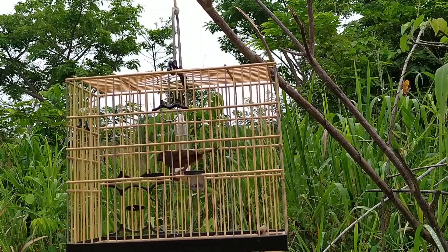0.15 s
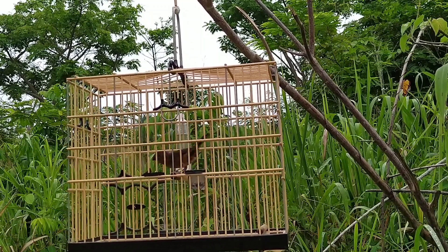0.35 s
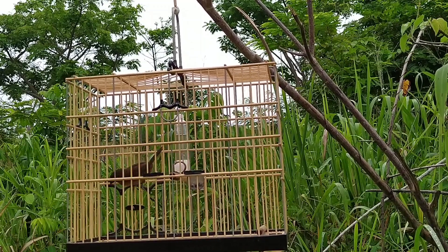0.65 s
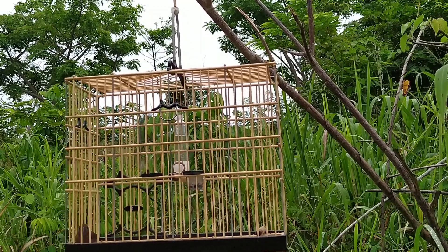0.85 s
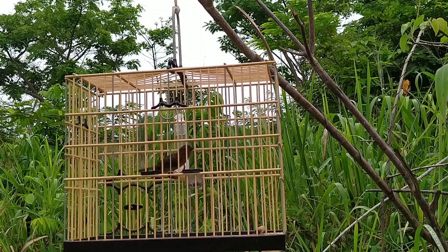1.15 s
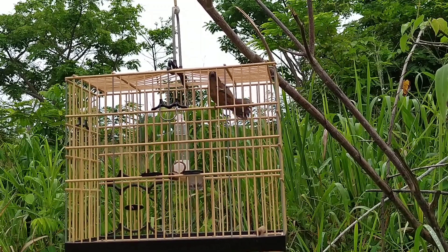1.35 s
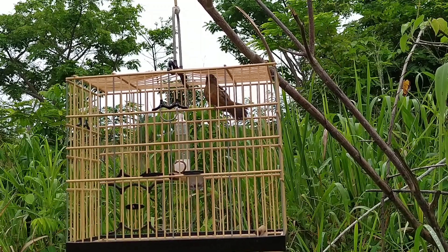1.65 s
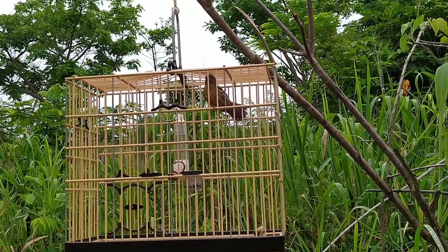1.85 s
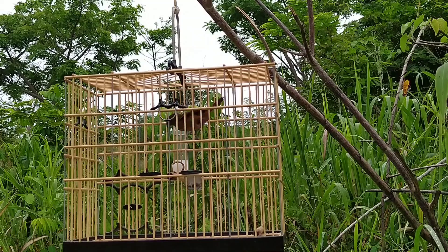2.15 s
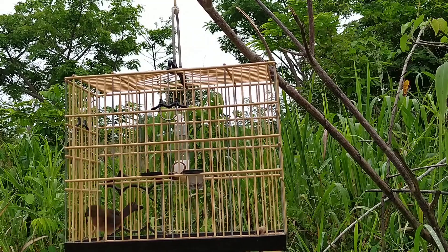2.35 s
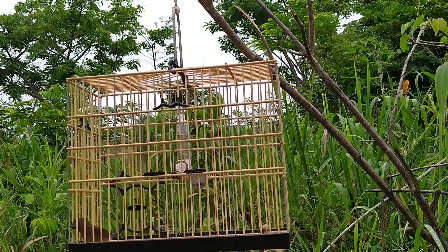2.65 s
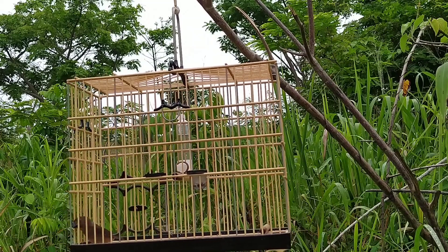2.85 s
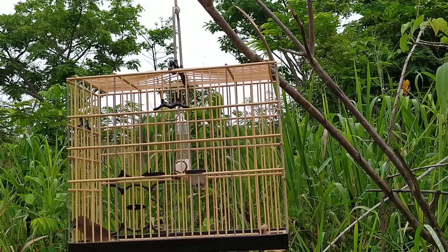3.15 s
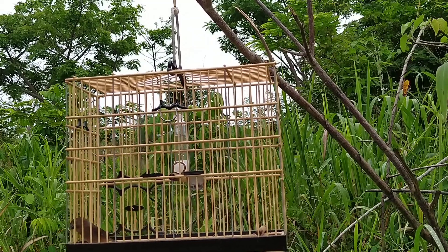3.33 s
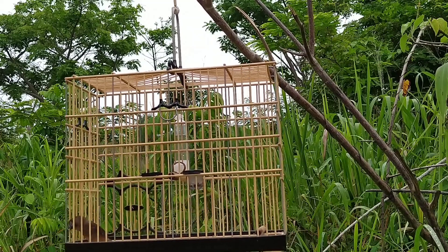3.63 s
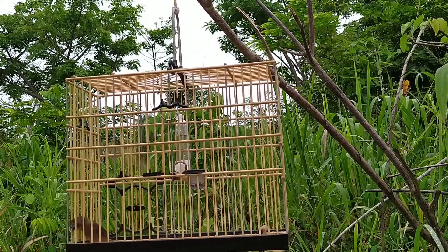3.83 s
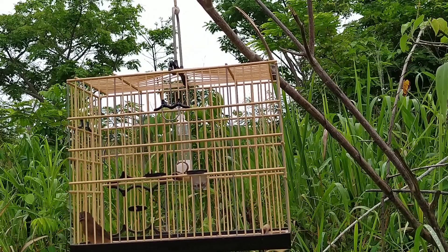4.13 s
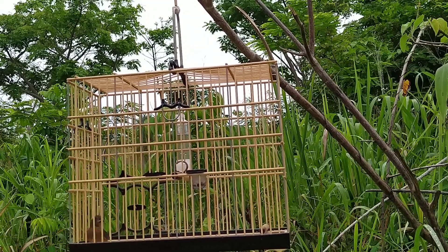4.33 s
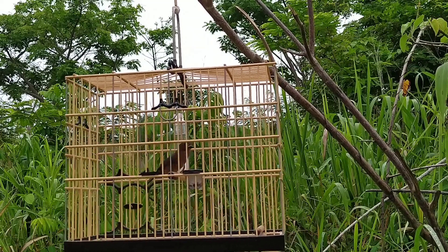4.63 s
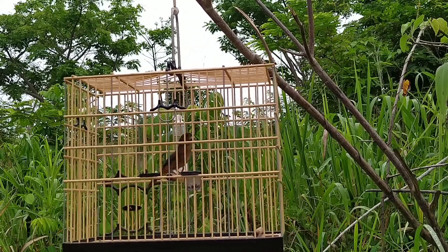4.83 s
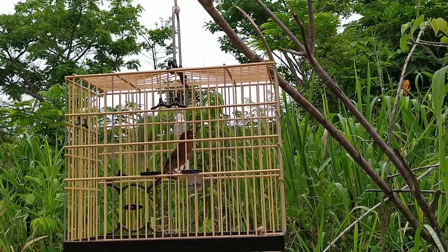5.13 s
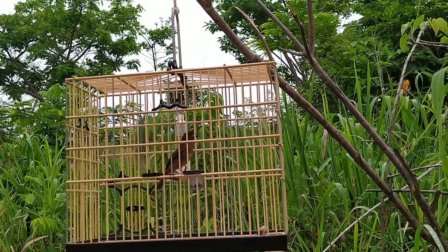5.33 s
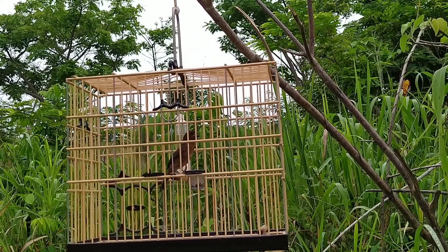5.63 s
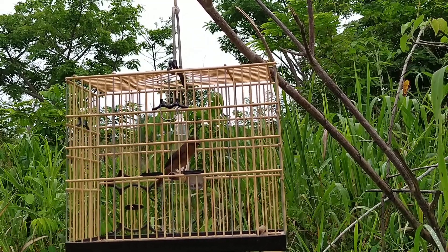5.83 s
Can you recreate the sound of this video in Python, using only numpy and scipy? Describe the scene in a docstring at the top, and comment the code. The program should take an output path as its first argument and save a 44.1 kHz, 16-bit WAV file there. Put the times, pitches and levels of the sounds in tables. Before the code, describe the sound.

A soft open-air hush and the thin, high pulsing of crickets run throughout. A bird hops in a cane cage, making light scratches and small knocks, clearest around 0.75 and 1 second and again at 2.4 seconds. Far off, another bird gives one faint arching whistle from 0.3 to 0.9 seconds, and a few tiny chips and low blips follow near 2 seconds. A distant engine revs very faintly in short rising bursts now and then.

At about 2.3 seconds a small bird, close to the microphone and slightly to the right, begins singing rapid, gliding whistled notes. The song starts softly and swells, becoming by far the loudest sound. Many notes slide downward, with a longer rising one around 4.5 seconds. It is loudest and busiest from about 4 seconds until the end at 6 seconds, with only a slight echo from the foliage.

```python
"""Finch in the bush, close up.

A finch near the camera's microphones sings a swelling phrase of gliding whistles: membranes in its
syrinx vibrate, throat and beak colour the tone, and stems and leaves scatter it back. Two crickets
scrape their wings, a bird hops about a cane cage and another whistles far off, with a few faint blips.
A distant engine revs under the hush of the open air."""
import sys
import numpy as np
from scipy import signal
from scipy.fft import rfft, irfft
from scipy.io import wavfile
from scipy.ndimage import uniform_filter1d, map_coordinates

SR = 44100
rng = np.random.default_rng(int(sys.argv[2]) if len(sys.argv) > 2 else 0)


def master(y):
    """Save y as 16-bit WAV."""
    cut = np.clip(np.atleast_2d(y).T, -1, 1)
    pcm = np.round(cut * 32767)  # scale
    wavfile.write(sys.argv[1], SR, pcm.astype(np.int16))


N = 263718

# The hush of the place. Each row: frequency in Hz, relative noise density in dB.
AIR_COLOUR = [(12, -48), (20, 7.5), (98, -9), (141, -11.5), (416, -12), (1020, -21), (2340, -23.5),
              (5110, -26.5), (6560, -26.5), (7130, -12), (7760, -28), (9420, -20.5), (12100, -33.5),
              (14300, -35.5), (15600, -38)]
# Slow rise and fall of the background's treble hiss. Each row: time in seconds, treble lift in dB.
TREBLE_DRIFT = [(0, 10.5), (.1, -5.5), (.7, -2), (1.3, -0.5), (1.6, -3), (2.1, -2.5), (3, .5), (6, 2)]
# How alike the air is at the two microphones. Each row: frequency in Hz, correlation.
AIR_LIKENESS = [(60, 0.37), (130, 0.33), (290, 0.4), (640, 0.42), (1410, -0.21), (3100, -0.042),
                (6820, -0.22), (15000, 0.24)]
# Claws and wings against the cage. Each row: start in seconds, relative scratch and knock levels
# in dB, left over right in dB, seconds for the scratch to fall 60 dB.
CAGE_CONTACTS = [(0.069, -61, -70, -1.5, 0.072), (0.3341, -64.5, -76, 0, 0.11),
                 (0.584, -62, -77, -1, 0.086), (0.726, -42.5, -70, -4, 0.013),
                 (0.729, -52.5, -69, -0.5, 0.05), (0.7431, -49, -57, -1, 0.079),
                 (0.756, -54, -48.5, -1, 0.043), (0.7667, -56, -49.5, 0, 0.057),
                 (0.7822, -66.5, -55, -3, 0.25), (1.0202, -50.5, -65, 8, 0.012),
                 (1.023, -62, -71, -1, 0.11), (1.051, -50, -56, -1, 0.11), (1.07, -49.5, -53.5, -1, 0.064),
                 (2.166, -58.5, -83, -2, 0.048), (2.3905, -52, -51, 0, 0.12), (2.4101, -64, -47.5, -3, 0.1)]
# The ring of the cane bars. Each row: frequency in Hz, relative level in dB, seconds to fall 60 dB.
CANE_MODES = [(236, -22, 0.046), (325, -24, .05), (397, -6, 0.18), (476, -9, 0.068), (547, 3, 0.063),
              (600, -24, 0.016), (830, -6.5, 0.075), (1120, -8, 0.034), (1326, -1, 0.041), (1540, -13, .03),
              (1955, 2.5, 0.025), (2560, -2, 0.033), (2890, -8, 0.031)]
# A scratch on cane. Each row: frequency in Hz, relative noise density in dB.
SCRATCH_COLOUR = [(590, -30), (1000, -17), (1640, -15), (1970, -11.5), (5100, -14.5), (7270, -7),
                  (9470, -2), (12000, -10.5), (15500, -23)]
# Bursts of throttle. Each row: start and end in seconds, first and last pitch in Hz, level in dB.
THROTTLE_BURSTS = [(0.254, 0.554, 72.5, 86.1, -64.5), (0.879, 1.395, 76.06, 102.2, -66),
                   (1.9, 2.204, 81.4, 101.5, -68.5), (2.502, 3.118, 77.94, 99.2, -67),
                   (3.646, 4.042, 74.4, 91.3, -67.5), (5.401, 6.006, 72.5, 91.6, -69.5)]
# Harmonics of the firing note. Each row: multiple, relative level in dB.
FIRING_HARMONICS = [(1, -2.5), (2, -10.5), (3, -5.5), (4, -11), (5, -17.5), (6, -13.5)]
# The far bird's arching call. Each row: time in seconds, pitch in Hz.
FAR_PITCH = [(0.301, 850), (0.352, 957), (0.45, 1230), (0.558, 1450), (.65, 1527), (0.719, 1543),
             (.801, 1520), (0.831, 1350), (.855, 1120)]
# Its overtones, heard from a distance. Each row: frequency in Hz, level in dB.
FAR_COLOUR = [(1700, -101), (2460, -85), (2830, -77), (3100, -66.5), (3400, -71.5), (4000, -72),
              (4300, -80), (4600, -80)]
# High chips and low blips. Each row: start and end in seconds, first and last pitch in Hz, level in dB.
BLIP_GLIDES = [(1.692, 1.731, 4100, 3610, -69.5), (1.73, 1.777, 3220, 2820, -78),
               (1.954, 1.98, 2850, 2650, -69.5), (1.978, 2.007, 2450, 2330, -73),
               (2.11, 2.283, 1560, 1510, -85), (1.897, 1.953, 249, 259, -65),
               (1.962, 1.998, 335, 326, -65.5), (1.995, 2.04, 442, 435, -67)]
# The finch's song. Each row is one note's pitch curve; each point: time in seconds, pitch in Hz.
SONG_PITCH = [
    [(2.255, 5200), (2.27, 4620), (2.291, 4290), (2.296, 4100)],
    [(2.306, 4080), (2.339, 3240)],
    [(2.411, 4440), (2.447, 4480), (2.47, 3920), (2.5, 3480)],
    [(2.558, 3990), (2.605, 4410), (2.63, 4060), (2.662, 3300)],
    [(2.717, 3705), (2.726, 7240), (2.735, 4620)],
    [(2.739, 3255), (2.78, 3454), (2.815, 3780), (2.846, 3210), (2.858, 2925)],
    [(2.913, 3050), (2.921, 6970)],
    [(2.936, 3167), (2.97, 3130), (3.025, 3620), (3.054, 3090), (3.064, 2860)],
    [(3.121, 3380), (3.128, 4490), (3.16, 3950), (3.186, 3620), (3.2, 3380)],
    [(3.255, 4500), (3.261, 4620), (3.27, 3160)],
    [(3.264, 4970), (3.275, 3970), (3.3, 3040), (3.315, 1940)],
    [(3.311, 6370), (3.33, 4800), (3.345, 4280), (3.354, 3920), (3.39, 3590), (3.421, 3310), (3.431, 3010)],
    [(3.498, 2274), (3.501, 4360), (3.506, 5600), (3.513, 3225), (3.53, 2070), (3.554, 1635)],
    [(3.559, 1980), (3.565, 2630), (3.6, 2823), (3.633, 3080), (3.66, 3640), (3.668, 3970), (3.675, 4470),
     (3.68, 6180), (3.686, 6210), (3.692, 4700)],
    [(3.749, 4140), (3.755, 5060), (3.77, 3900), (3.786, 3705), (3.8, 3557), (3.845, 3640)],
    [(3.896, 4300), (3.902, 5190), (3.911, 4630), (3.922, 3920), (3.96, 3400), (4.0, 3026), (4.04, 2650),
     (4.055, 1975)],
    [(4.124, 2930), (4.129, 5700), (4.138, 3410), (4.148, 2910), (4.154, 4480)],
    [(4.16, 4510), (4.19, 3670), (4.223, 3254), (4.25, 3000), (4.3, 2583), (4.316, 2370), (4.321, 1820)],
    [(4.389, 1162), (4.398, 1600), (4.41, 1595), (4.45, 1993), (4.52, 2563), (4.585, 2933), (4.602, 2504),
     (4.608, 2100)],
    [(4.681, 1140), (4.69, 1630), (4.702, 1670), (4.716, 1956), (4.731, 2090), (4.739, 5260), (4.748, 1977),
     (4.772, 1545), (4.782, 987)],
    [(4.834, 3750), (4.84, 5020), (4.846, 5280), (4.852, 3950)],
    [(4.855, 5680), (4.875, 4180), (4.882, 3800), (4.913, 3040)],
    [(4.911, 3650), (4.925, 3260), (4.946, 2280)],
    [(4.986, 1504), (4.995, 2530), (5.008, 2644), (5.011, 4550), (5.015, 5600), (5.022, 2124), (5.04, 1687),
     (5.055, 1220)],
    [(5.091, 3360), (5.098, 4580), (5.101, 4410)],
    [(5.102, 6070), (5.115, 6040), (5.136, 3900)],
    [(5.108, 3005), (5.115, 2990), (5.136, 1855)],
    [(5.136, 1870), (5.148, 3670), (5.17, 3240), (5.186, 2740), (5.201, 2220)],
    [(5.2, 2305), (5.21, 3990), (5.225, 3300), (5.254, 2610), (5.26, 2500), (5.269, 2010)],
    [(5.331, 1920), (5.338, 3210), (5.38, 3480), (5.42, 4280), (5.428, 4840), (5.433, 4920)],
    [(5.428, 2040), (5.437, 3050), (5.47, 3304), (5.503, 4110), (5.517, 5380)],
    [(5.521, 5290), (5.534, 5740)],
    [(5.589, 7100), (5.594, 4670), (5.599, 2160)],
    [(5.597, 6120), (5.603, 4400), (5.62, 3050), (5.65, 2335), (5.669, 2080), (5.677, 1820)],
    [(5.674, 4400), (5.68, 4280), (5.699, 2710)],
    [(5.695, 4420), (5.705, 3270), (5.74, 2560), (5.8, 1693), (5.81, 1295), (5.814, 1040)],
    [(5.897, 1807), (5.903, 2796), (5.91, 2113), (5.925, 1750), (5.937, 1307), (5.947, 3390), (5.955, 1950),
     (5.97, 1840), (5.978, 1380)],
]
# How each note is voiced. Each row: relative level at start, turn and end in dB, place of the turn
# from 0 to 1, trims of octave, upper overtones and hiss in dB.
SONG_VOICING = [(-78, -58, -55, 0.37, 17.5, -2, -34), (-64, -49, -58, 0.8, 10, 5, -50),
                (-55, -40.5, -38, 0.83, 5, 0, -53), (-43, -37, -33.5, 0.54, 3, 6, -72),
                (-46, -29, -53, 0.56, -10, .1, -40), (-41, -39, -37.5, 0.4, 1, -1, -68),
                (-50, -46, -28.5, 0.77, -9, .1, -24), (-40, -35.5, -34, 0.3, 2.5, -1.5, -65),
                (-44, -33, -31.5, 0.3, 0.5, 1, -66), (-37, -44, -27, 0.9, 2, .1, -38),
                (-40, -31, -35.5, 0.43, 0.5, -5, -35), (-40.5, -29, -31.5, 0.49, 1, 2, -54),
                (-38, -32.5, -38, 0.64, 2, -4.5, -20), (-41, -26.5, -32.5, 0.39, 0, -3.5, -53),
                (-33.5, -28.5, -30, 0.7, 1.5, -4.5, -58), (-32, -23, -31, 0.71, 5, 4.5, -50),
                (-29.5, -35.5, -20, 0.93, -5, 9.5, -28.5), (-34.5, -21.5, -30.5, 0.56, 0, 3, -56),
                (-29, -30, -24.5, 0.3, -4.5, 2, -35.5), (-32.5, -28, -30, 0.5, 0, 1, -24.5),
                (-44, -21, -33, 0.6, 9, -12, -58), (-17, -24, -30, 0, 7.5, 7.5, -51),
                (-28, -27, -31, 0.55, 0.5, 0.5, -36), (-33.5, -29.5, -33, 0.6, 5, 2, -24),
                (-41, -31.5, -23, 0.78, 27, 2, -24), (-14, -33.5, -26, 0.76, 3, -1, -38.5),
                (-41, -32, -41, 0.75, -20, 14.5, -18), (-29, -30.5, -26.5, 0, 4.5, 3, -30),
                (-30.5, -24.5, -38, 0.74, 5, 3, -37), (-36, -19.5, -30.5, 0.86, 5.5, 3.5, -40),
                (-39.5, -26, -21.5, 0.27, 5, 6.5, -46.5), (-21.5, -32.5, -26.5, 0.44, 18, .1, -33),
                (-13, -22, -37, 0.28, -4, -9, -48), (-26, -37.5, -28, 0.14, 5, 1, -20.5),
                (-29, -22.5, -36, 0.6, .1, 3, -35), (-28, -22, -29.5, 0.38, -3, -5.5, -38.5),
                (-35, -33, -31.5, 0.23, 4, -9, -23)]
# The throat lifts a fundamental around 3.5 kHz. Each row: pitch in Hz, gain in dB.
FUNDAMENTAL_GAIN = [(1100, -27.5), (1500, -20.5), (2000, -14), (2400, -9), (2650, -5), (2900, -3),
                    (3200, -1.5), (3600, -0.4), (4000, 0.5), (5000, -0.5), (6000, -7.5), (7200, -21)]
# On low notes it lifts the octave instead. Each row: pitch in Hz, gain over the fundamental in dB.
OCTAVE_GAIN = [(1100, 8.5), (1900, 9.5), (2300, 0.5), (2600, -16), (3100, -35), (4000, -30), (4500, -28),
               (5500, -25.5), (7000, -9)]
# The beak's gape swells or dips the octave. Each row: time and half width in seconds, gain in dB.
BEAK_GAPES = [(3.52, 0.0073, 16.5), (4.6, 0.014, 3.5), (3.955, 0.03, -17), (5.615, 0.016, 26.5)]
# Upper overtones at the syrinx. Each row: multiple, relative level in dB.
SYRINX_OVERTONES = [(3, -16), (4, -15), (5, -14.5), (6, -12.5), (7, -22), (8, -16.5)]
# Throat, beak and microphone together, shaping those overtones. Each row: frequency in Hz, gain in dB.
TRACT_COLOUR = [(900, -36.5), (2000, -17), (3000, -14), (4600, -11.5), (6000, -22.5), (8000, -27.5),
                (10800, -26), (12300, -44), (13600, -40.5), (15500, -30.5)]
# Hiss around each whistled note. Each row: frequency in Hz, relative noise density in dB.
NOTE_HISS = [(1200, -23.5), (1800, -18.5), (3500, -8.5), (5500, -0.5), (7500, -16.5), (10500, -9.5),
             (12000, -25), (13600, -27), (15500, -41)]
# The singer turning. Each row: time in seconds, left microphone's lag in samples, share of the bounce.
SINGER_TURN = [(4.39, 6.5, .45), (4.43, 4.4, .3), (4.53, 2.1, .2)]
# The camera body shades its two microphone ports unequally.
# Each row: frequency in Hz, left over right in dB.
PORT_SHADE = [(3000, -0.9), (4500, -2.5), (6500, 0), (8000, -4.5), (9200, -11.5), (10300, 1), (11100, 4.5),
              (13000, 2.5), (15500, .1)]
# It shifts their phase too. Each row: frequency in Hz, lead of the left port in radians.
PORT_PHASE = [(7000, 0), (8300, .6), (9700, 1.6), (10300, 1.6), (11100, .9), (12500, .5), (15500, 1.1)]
# Echoes from leaves farther off. Each row: frequency in Hz, gain in dB.
LEAF_ECHO_COLOUR = [(1500, 14), (3000, 3.2), (4500, 3.2), (6000, 8), (10000, -20)]

HUSH_DB, EDGE_HZ = -60, 15690  # level of the air; top of the recorder's band
CHIRP_S, TRILL_S, STROKE_S = .07205, .607, .0217  # repeat times of chirp, trill and wing stroke
ATTACK_S, RELEASE_S = .009, .011  # of each finch note
FLARE_DB, FLARE_S = 6.5, .051  # upper overtones flare as a note is struck
HISS_FADE_DB, GLIDE_HISS_DB, FAST_OCTAVES_PER_S = -3, -34.5, 36
END_HISS_DB, END_HISS_S = -39.5, .0099
BOUNCE_S = .000775  # a surface close to the left port repeats the song, inverted, this much later


def gain_of(db):
    """Decibels to amplitude."""
    return 10 ** (np.asarray(db) / 20)


def unit_rms(x):
    """Scales x to an rms of 1."""
    return x / np.sqrt(np.mean(x ** 2) + 1e-20)


def wobble(shape, size):
    """Smooth random drift of rms 1 that changes over about size steps."""
    return unit_rms(uniform_filter1d(uniform_filter1d(rng.standard_normal(shape), size), size))


def read(points, hz):
    """Looks up hz in a table, on a logarithmic frequency axis."""
    table_hz, value = np.transpose(points)
    return np.interp(np.log(hz + 1), np.log(table_hz + 1), value)


def add(mix, start_s, sound):
    """Mixes a sound in from start_s on."""
    part = mix[..., round(start_s * SR):][..., :sound.shape[-1]]
    part += sound[..., :part.shape[-1]]


def coloured(x, points):
    """Filters x by a spectrum table."""
    return irfft(rfft(x) * gain_of(read(points, np.fft.rfftfreq(x.shape[-1], 1 / SR))), x.shape[-1])


def fade(t, rise, fall):
    """Soft start and end over the times t."""
    return np.sin(np.pi / 2 * np.clip(np.minimum((t - t[0]) / rise, (t[-1] - t) / fall), 0, 1)) ** 2


def bush(x, t60, gap_s):
    """Echoes off stems and leaves: sparse taps of random sign, a separate set at each microphone."""
    t = np.arange(SR // 2) / SR
    taps = rng.standard_normal((2, len(t))) * (rng.random((2, len(t))) < .08)
    taps *= gain_of(-60 * t / t60) * (t > gap_s)
    return signal.fftconvolve(x, taps / np.linalg.norm(taps, axis=1)[:, None], axes=1)[:, :N]


def air():
    """Open air all round the microphones: a patchy hush whose treble slowly rises and falls."""
    frames, hz = N // 256 + 5, np.fft.rfftfreq(1024, 1 / SR)
    left_re, left_im, own_re, own_im, patches = rng.standard_normal((frames, 513, 5)).T
    patches = unit_rms(uniform_filter1d(uniform_filter1d(patches, size=14, axis=0), size=10, axis=1))
    drift_db = np.interp(np.arange(frames) * 256 / SR, *np.transpose(TREBLE_DRIFT))
    drift_db += 1.2 * wobble(frames, size=5)
    treble = np.clip(hz / 9000, 0, 1)[:, None]
    likeness = read(AIR_LIKENESS, hz)[:, None]
    left = left_re + 1j * left_im
    right = likeness * left + np.sqrt(1 - likeness ** 2) * (own_re + 1j * own_im)
    colour = gain_of(read(AIR_COLOUR, hz)[:, None] + 1.5 * patches + treble * drift_db)
    hush = signal.istft(np.array([left, right]) * colour, nperseg=1024, noverlap=768)[1][:, :N]
    return gain_of(HUSH_DB) * unit_rms(hush) * gain_of([[-.3], [.3]])


def wing_stroke(length_s, from_hz, to_hz, rise, fall):
    """One scrape of file on wing: a tone that sags as the wing slows."""
    t = np.arange(0, length_s, 1 / SR)
    hz = from_hz + (to_hz - from_hz) * (t / length_s) ** 2
    phase = 2 * np.pi * (np.cumsum(hz) / SR + rng.random())
    return np.sqrt(2) * np.sin(phase) * fade(t, rise, fall)


def crickets():
    """One cricket near the centre chirps evenly; one off to the right trills for half of each cycle."""
    chirps, trills = np.zeros((2, 2, N))
    for start in np.arange(.266 - 3 * CHIRP_S, N / SR, CHIRP_S):
        stroke = wing_stroke(.024, 7210, 7040, rise=.003, fall=.004)
        stroke *= gain_of(.5 * rng.standard_normal())
        pair = np.array([np.pad(stroke, (0, 2)), np.pad(stroke, (2, 0))])  # 2 samples later on the right
        add(chirps, start, pair * gain_of([[-58], [-59]]))
    for trill_start in np.arange(.507 - TRILL_S, N / SR, TRILL_S):
        for start in trill_start + STROKE_S * np.arange(14):
            stroke = wing_stroke(.02, 7345, 7275, rise=.008, fall=.009)
            stroke *= gain_of(.8 * rng.standard_normal())
            if start >= 0:
                add(trills, start, stroke * gain_of([[-64], [-53]]))
    echoes = bush(chirps, t60=.07, gap_s=.004) + bush(trills, t60=.1, gap_s=.004)
    return chirps + trills + gain_of(-12) * echoes


def cage_hops():
    """A bird hops in its cage: each contact is a gritty scratch and a cluster of knocks on the bars."""
    out, t = np.zeros((2, N)), np.arange(4096) / SR
    ring = sum(gain_of(db - 60 * t / t60) * np.sin(2 * np.pi * hz * t) for hz, db, t60 in CANE_MODES)
    for start, scratch_db, knock_db, pan_db, t60 in CAGE_CONTACTS:
        grit, blows = rng.standard_normal((2, 2, len(t)))
        scratch = unit_rms(coloured(grit * gain_of(4.1 * blows), SCRATCH_COLOUR))
        scratch *= gain_of(scratch_db + 5 - 60 * t / t60) * (1 - np.exp(-t / .0005))
        knock = signal.fftconvolve(blows[0] * gain_of(-60 * t / .036), ring)[:len(t)]
        knock *= gain_of(knock_db - 8) / np.sqrt(np.mean(knock[:800] ** 2))
        add(out, start, (scratch + knock) * gain_of([[pan_db / 2], [-pan_db / 2]]))
    return out


def engine():
    """A distant engine: its firing note climbs under each burst of throttle, then fades."""
    out = np.zeros(N)
    for start, end, from_hz, to_hz, db in THROTTLE_BURSTS:
        t = np.arange(start, end, 1 / SR)
        phase = 2 * np.pi * np.cumsum(np.linspace(from_hz, to_hz, len(t))) / SR
        firing = sum(gain_of(k_db) * np.sin(k * phase + 2 * np.pi * rng.random())
                     for k, k_db in FIRING_HARMONICS)
        add(out, start, np.sqrt(2) * gain_of(db) * firing * fade(t, .017, .052))
    return out


def far_bird():
    """One arching whistle from far off, heard as its second and third harmonics."""
    out = np.zeros(N)
    times, pitches = np.transpose(FAR_PITCH)
    t = np.arange(times[0], times[-1], 1 / SR)
    hz = uniform_filter1d(np.interp(t, times, pitches), size=900, mode="nearest")
    phase = 2 * np.pi * np.cumsum(hz) / SR
    call = sum(gain_of(read(FAR_COLOUR, k * hz) + 1.5 * wobble(len(t), size=500)) * np.sin(k * phase)
               for k in (2, 3))
    add(out, times[0], np.sqrt(2) * call * fade(t, .01, .052))
    return out


def blips():
    """Faint high chips and hollow low blips in the distance: short, wavering pure tones."""
    out = np.zeros(N)
    for start, end, from_hz, to_hz, db in BLIP_GLIDES:
        t = np.arange(start, end, 1 / SR)
        hz = np.linspace(from_hz, to_hz, len(t)) * (1 + .03 * wobble(len(t), size=120))
        tone = np.sqrt(2) * np.sin(2 * np.pi * np.cumsum(hz) / SR)
        flicker_db = from_hz / 1200 * wobble(len(t), size=150)
        add(out, start, gain_of(db + flicker_db) * tone * fade(t, .0083, .014))
    return out


def whistle(t, hz, db, effort_db, octave_db, upper_db):
    """A membrane's near-sine and its unsteady overtones, shaped by throat and beak."""
    n = len(t)
    phase = 2 * np.pi * np.cumsum(hz * (1 + .0071 * wobble(n, size=60))) / SR
    jittered = phase + .09 * wobble(n, size=40)  # the membrane's quick jitter, in radians
    level = gain_of(db + .8 * wobble(n, size=200))
    gape_db = sum(lift_db * np.exp(-((t - at) / width) ** 2) for at, width, lift_db in BEAK_GAPES)
    octave = gain_of(octave_db + read(OCTAVE_GAIN, hz) + gape_db + 1.8 * wobble((2, n), size=150))
    tone = level * (np.sin(phase) + octave * np.sin(2 * jittered))
    slack_db = 21.3 * np.clip(np.log2(2800 / hz), 0, .55)  # slack membranes slap shut and sound brighter
    flare_db = FLARE_DB * np.exp(-(t - t[0]) / FLARE_S)
    source_db = effort_db + upper_db + slack_db + flare_db
    for k, k_db in SYRINX_OVERTONES:
        # the beak throws short waves unevenly, so each microphone gets its own level and phase
        uneven_db, uneven_phase = 2.5 * wobble((2, n), size=200), .6 * wobble((2, n), size=140)
        overtone_db = source_db + k_db + read(TRACT_COLOUR, k * hz) + uneven_db
        in_band = np.clip((EDGE_HZ - k * hz) / 1500, 0, 1)
        tone += gain_of(overtone_db) * np.sin(k * jittered + uneven_phase) * in_band
    return np.sqrt(2) * tone


def hiss(t, hz, hiss_db):
    """Hiss around a whistled note: it eases as the note goes on, flaring in fast glides and at the end."""
    n = len(t)
    shared, *own = rng.standard_normal((3, n))
    noise = unit_rms(coloured(shared + 2 * np.array(own), NOTE_HISS))
    noise *= gain_of(.9 * wobble(n, size=100))
    lumpy_colour = gain_of(5 * wobble(n // 2 + 1, size=n // 60 + 1))
    noise = irfft(rfft(noise) * lumpy_colour, n)
    octaves_per_s = uniform_filter1d(abs(np.gradient(np.log2(hz))) * SR, size=300)
    easing = gain_of(hiss_db + HISS_FADE_DB * (t - t[0]) / (t[-1] - t[0]))
    gliding = gain_of(GLIDE_HISS_DB) * np.clip(octaves_per_s / FAST_OCTAVES_PER_S, 0, 1) ** 2
    ending = gain_of(END_HISS_DB) * np.exp((t - t[-1]) / END_HISS_S)
    return noise * (easing + gliding + ending)


def finch_note(pitch_curve, start_db, turn_db, end_db, place, octave_db, upper_db, hiss_db):
    """One breath whistled along a pitch curve, with hiss around it; returns start time and sound."""
    times, pitches = np.transpose(pitch_curve)
    start, end = times[0], times[-1]
    t = np.arange(start - ATTACK_S / 2, end + RELEASE_S / 2, 1 / SR)
    hz = uniform_filter1d(np.interp(t, times, pitches), size=85, mode="nearest")
    turn_s = start + np.clip(place, .05, .95) * (end - start)
    breath_db = np.interp(t, [start, turn_s, end], [start_db, turn_db, end_db])
    db = uniform_filter1d(breath_db, size=len(t) // 4, mode="nearest") + read(FUNDAMENTAL_GAIN, hz)
    effort_db = db - read(TRACT_COLOUR, hz)  # the level ahead of throat and beak
    sound = whistle(t, hz, db, effort_db, octave_db, upper_db) + gain_of(effort_db) * hiss(t, hz, hiss_db)
    return t[0], sound * fade(t, ATTACK_S, RELEASE_S)


def finch():
    """The song, close by, reaches the right microphone first and louder; the bush answers weakly."""
    voice, samples = np.zeros((2, N)), np.arange(N)
    for pitch_curve, voicing in zip(SONG_PITCH, SONG_VOICING):
        add(voice, *finch_note(pitch_curve, *voicing))
    times, lags, shares = np.transpose(SINGER_TURN)
    lag, share = np.interp(samples / SR, times, lags), np.interp(samples / SR, times, shares)
    bounce = share * map_coordinates(voice[0], [samples - BOUNCE_S * SR], order=3)
    left = map_coordinates(voice[0] - bounce, [samples - lag], order=3)
    pair = np.array([left, voice[1]]) * gain_of([[.2], [.6]])
    hz = np.fft.rfftfreq(N, 1 / SR)
    port = gain_of(read(PORT_SHADE, hz) / 2) * np.exp(.5j * read(PORT_PHASE, hz))
    low_cut = 1 / (1 + (850 / (hz + 1)) ** 12)  # nothing of the voice sounds below about 850 Hz
    direct = irfft(rfft(pair) * [port, 1 / port] * low_cut, N)
    near_echo = gain_of(-21) * bush(direct, t60=.06, gap_s=.0015)
    far_echo = gain_of(-28) * bush(coloured(direct, LEAF_ECHO_COLOUR), t60=.22, gap_s=.0074)
    return direct + near_echo + far_echo


def scene():
    """The finch up front, the rest of the place behind it."""
    song = finch()
    distant = far_bird() + blips()
    distant_echo = gain_of(-6) * bush(distant[None], t60=.14, gap_s=.003)
    return song + distant + distant_echo + crickets() + cage_hops() + engine() + air()


def record(dry):
    """The recorder passes nothing above its band."""
    low_pass = signal.firwin(2047, EDGE_HZ, window=("kaiser", 10), fs=SR)
    return signal.oaconvolve(dry, low_pass[None], "same")


dry = scene()
out = record(dry)
master(out)
```